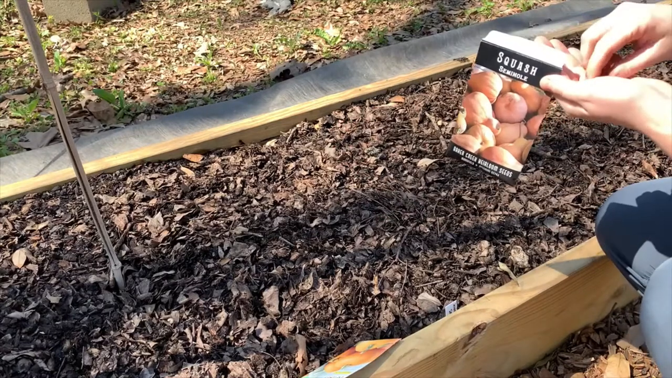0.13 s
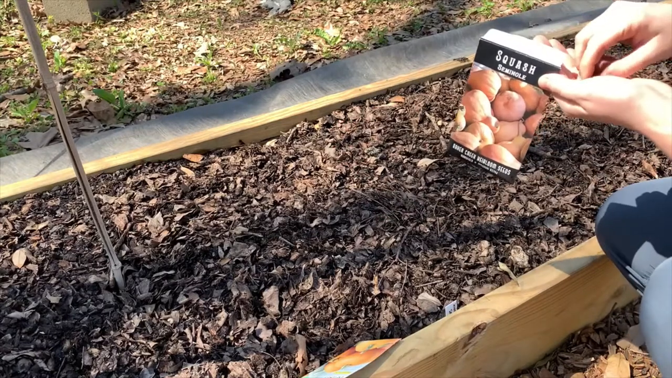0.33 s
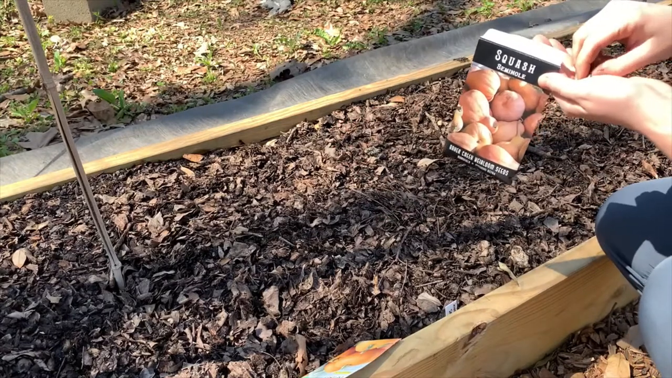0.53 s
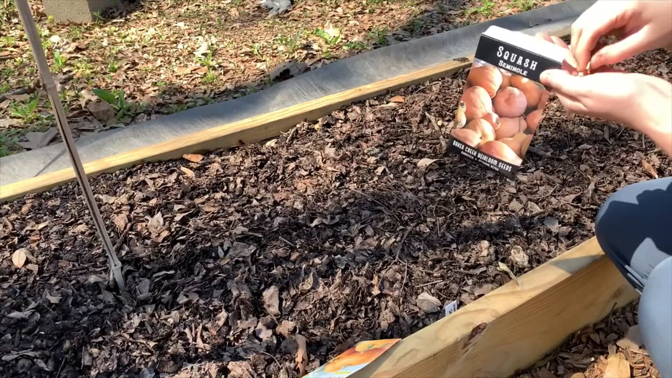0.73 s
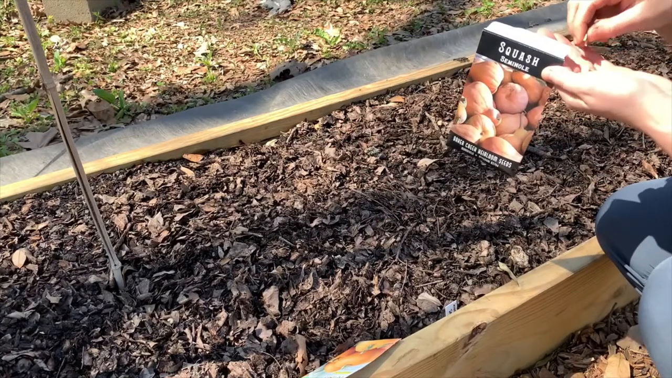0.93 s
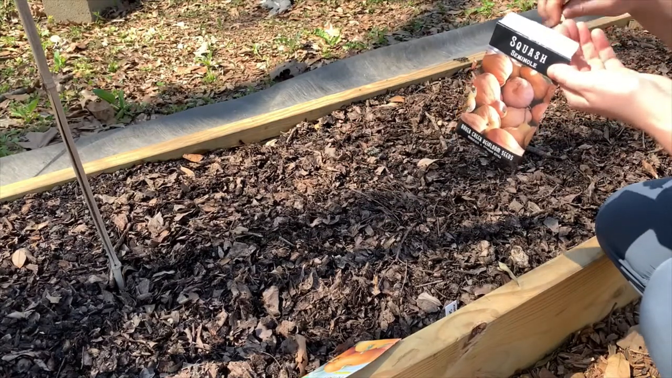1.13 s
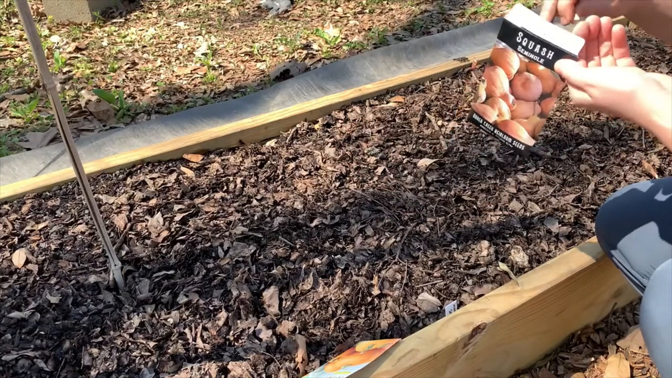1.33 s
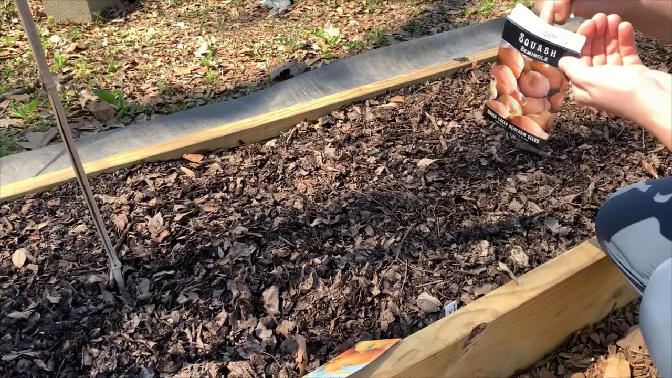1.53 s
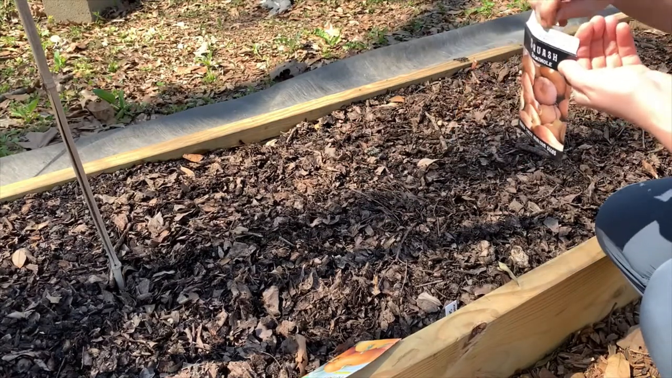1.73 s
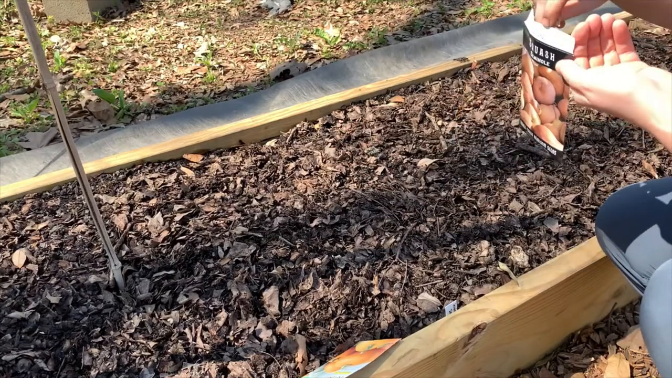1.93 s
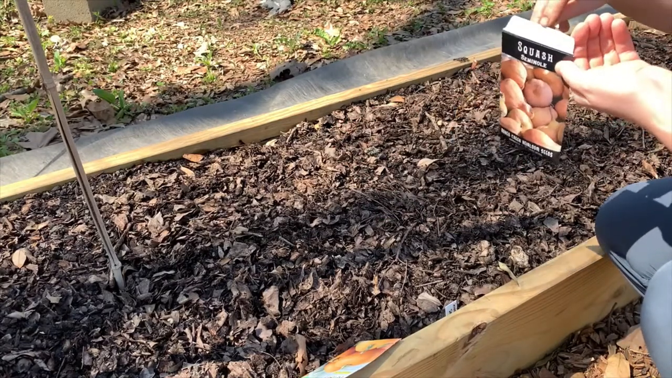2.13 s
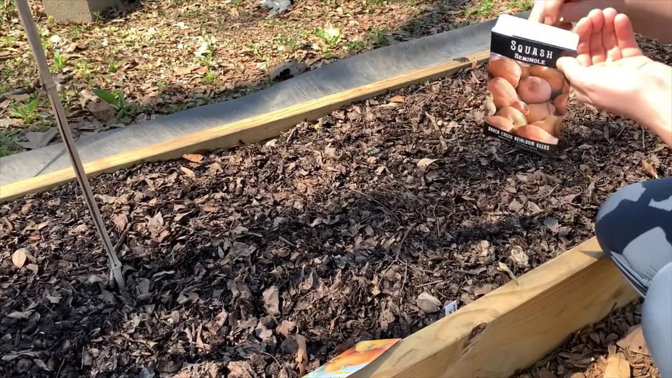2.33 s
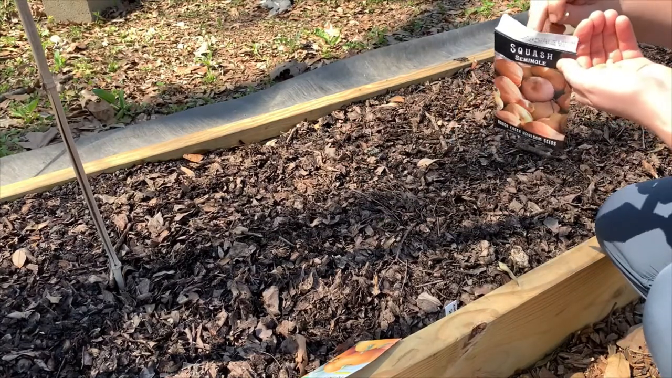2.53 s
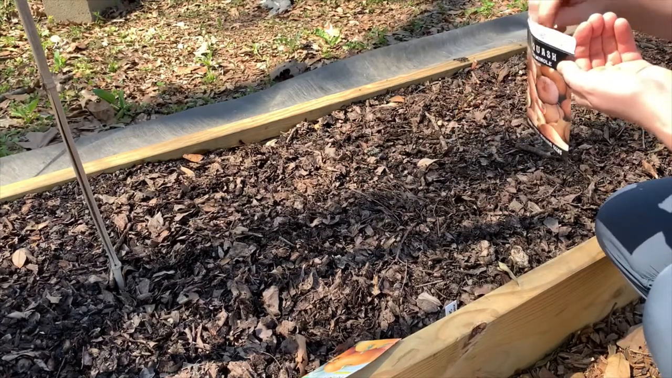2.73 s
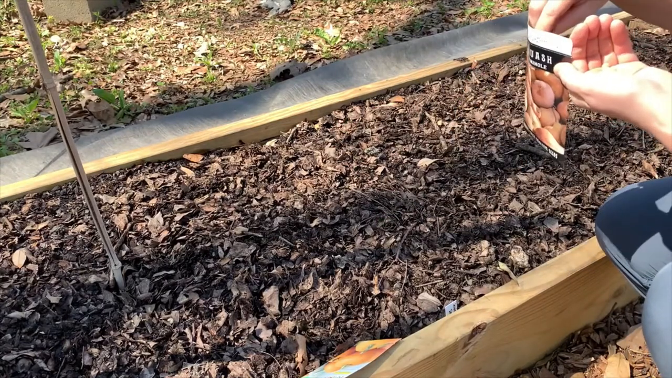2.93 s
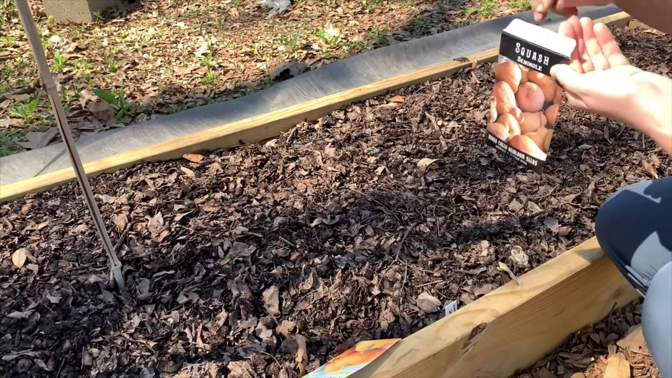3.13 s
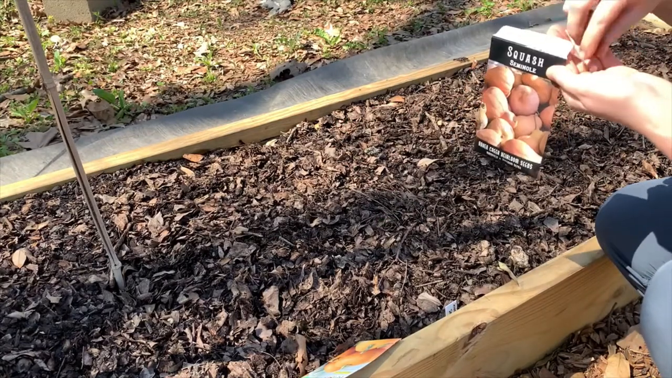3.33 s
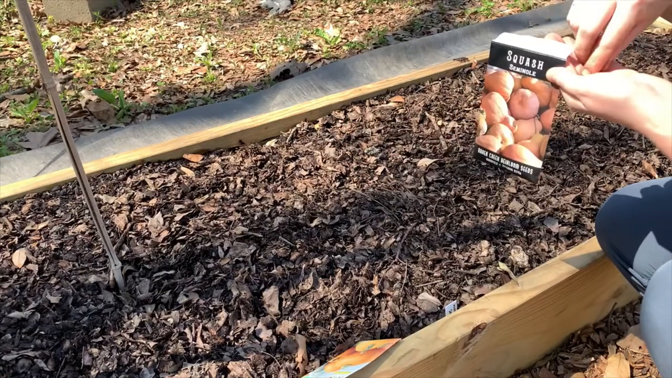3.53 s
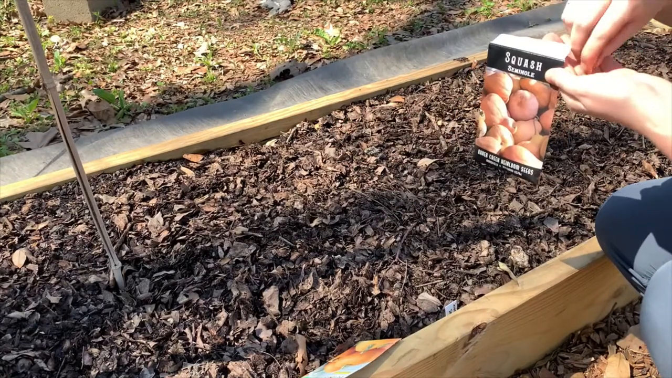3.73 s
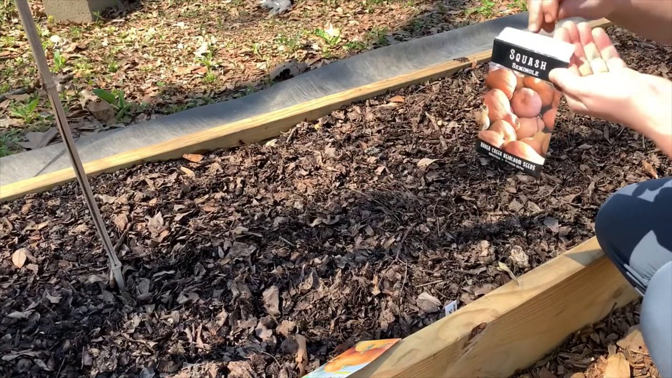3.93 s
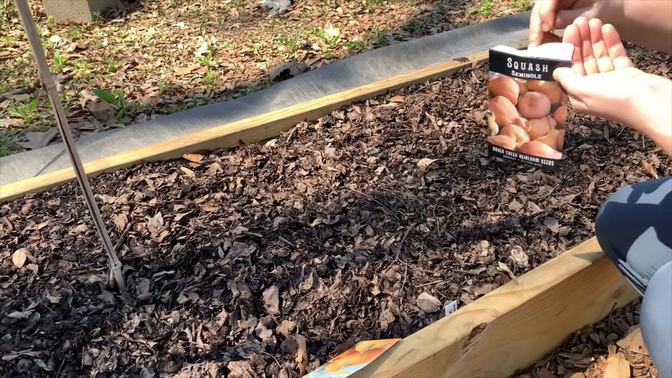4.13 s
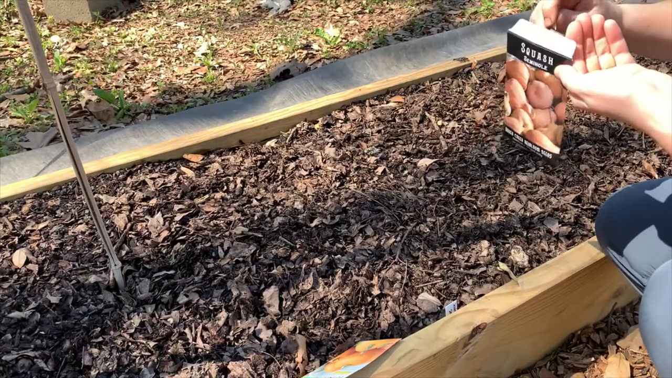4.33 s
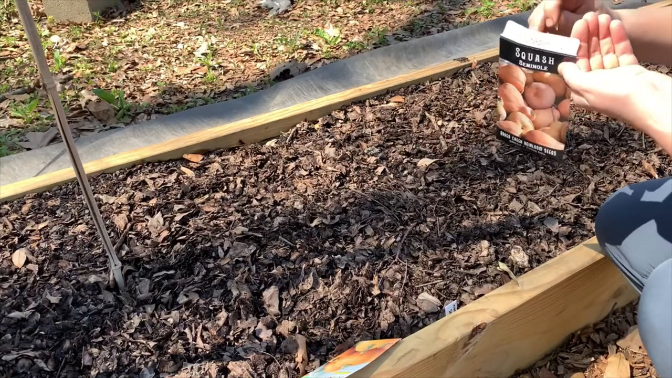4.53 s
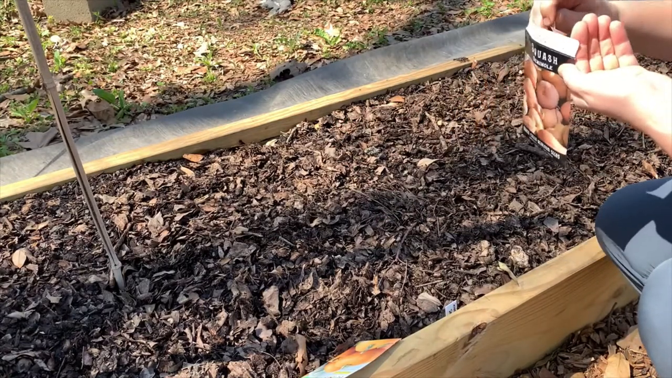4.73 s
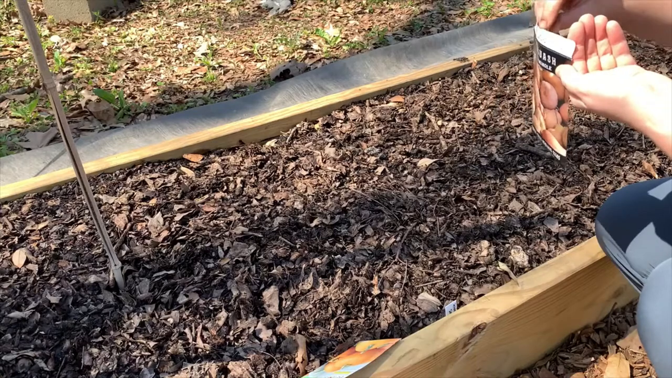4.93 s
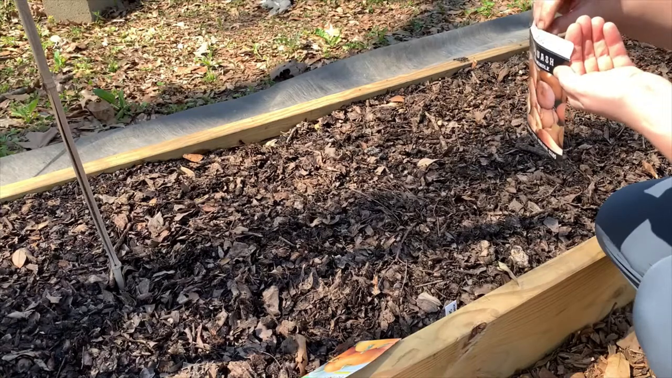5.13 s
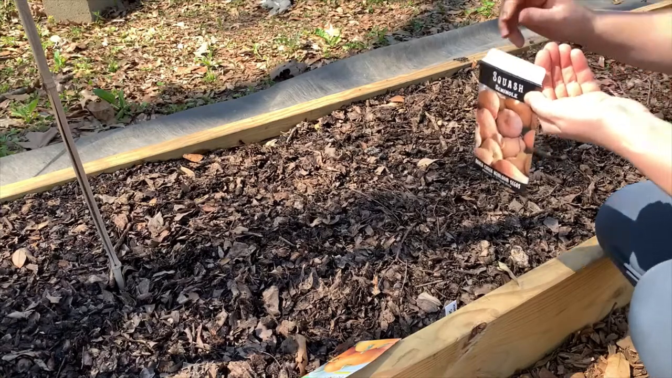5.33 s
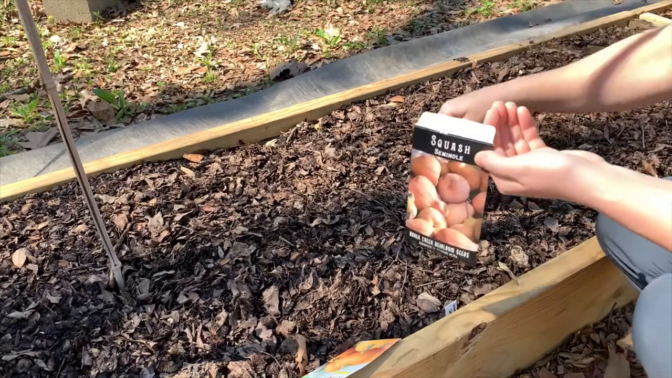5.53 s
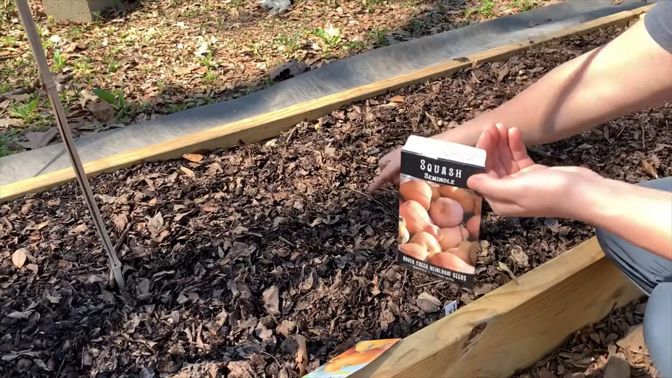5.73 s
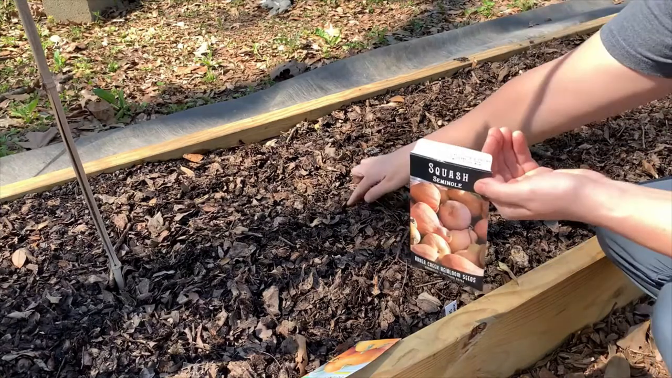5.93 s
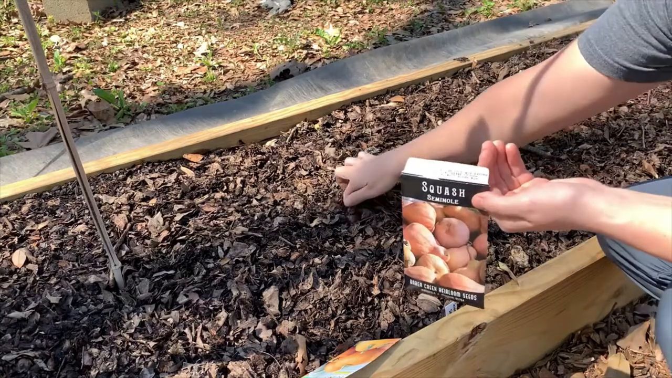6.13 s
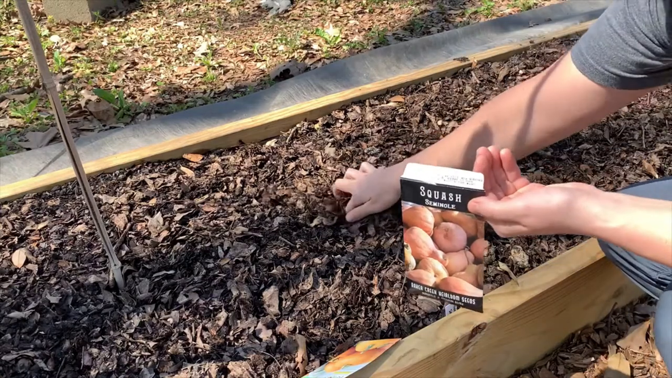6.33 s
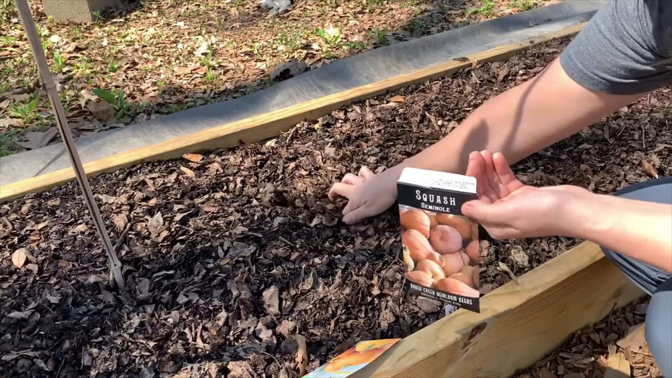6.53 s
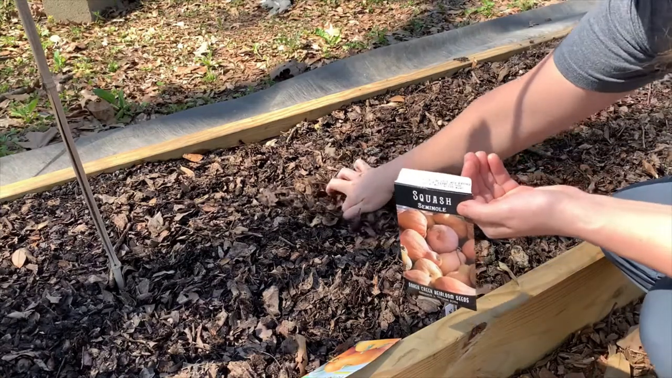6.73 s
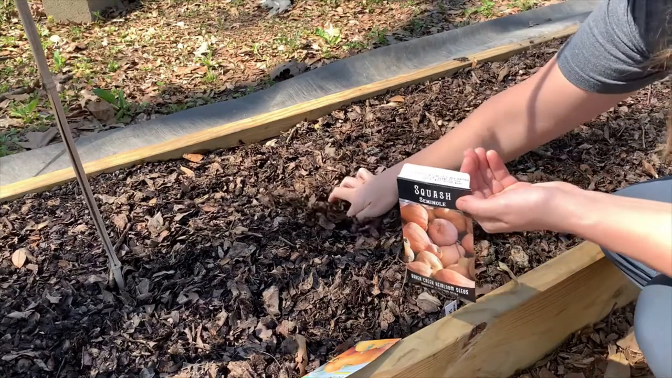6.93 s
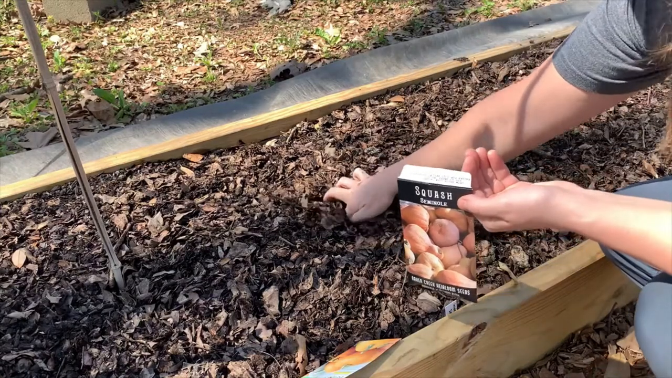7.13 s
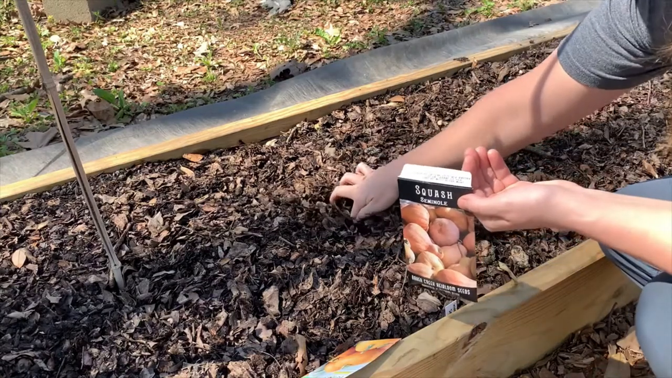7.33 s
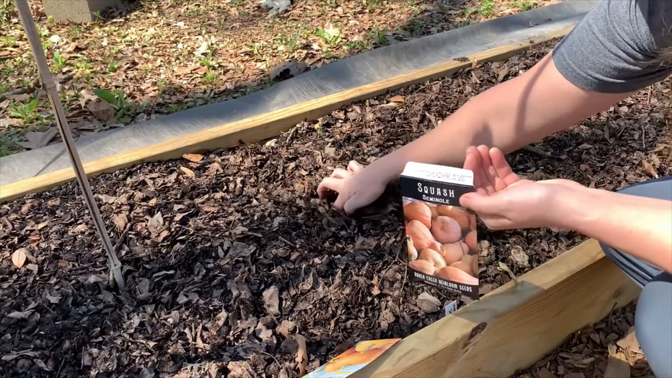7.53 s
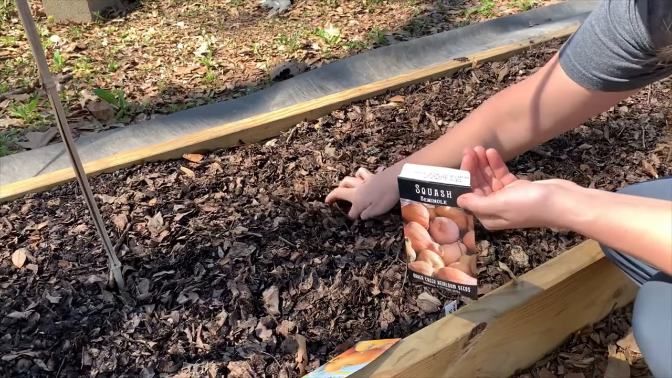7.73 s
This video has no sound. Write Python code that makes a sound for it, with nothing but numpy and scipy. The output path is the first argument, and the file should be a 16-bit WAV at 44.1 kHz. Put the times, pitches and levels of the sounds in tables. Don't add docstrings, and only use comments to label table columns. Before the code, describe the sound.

Outdoors, a brief falling bird whistle, then close dry paper rustling with seed taps, ending in faint bark-chip scratching above low wind and distant engines.

```python
import sys
import numpy as np
from scipy import signal
from scipy.fft import rfft, irfft, next_fast_len
from scipy.io import wavfile
from scipy.ndimage import uniform_filter1d, minimum_filter1d

SR = 44100
rng = np.random.default_rng(int(sys.argv[2]) if len(sys.argv) > 2 else 0)


def volts_from_db(level):
    exponent = np.asarray(level, float) / 20
    return 10 ** exponent


def to_wav(s):
    ch = np.atleast_2d(s).T
    pcm = np.round(np.clip(ch, -1, 1) * 32767)
    wavfile.write(sys.argv[1], SR, pcm.astype(np.int16))


N = 343695


def evened(x):
    return x / np.sqrt(np.mean(x ** 2) + 1e-20)


def read(points, hz, outside=None):
    f, value = np.transpose(points)
    return np.interp(np.log(hz + 1), np.log(f + 1), value, outside, outside)


def follow(rows):
    s, *columns = np.transpose(rows)
    return [np.interp(np.arange(N) / SR, s, c) for c in columns]


def coloured(x, points):
    size = next_fast_len(N)
    gain = volts_from_db(read(points, np.fft.rfftfreq(size, 1 / SR), -86.0))
    return evened(irfft(rfft(x, size) * gain, size)[..., :N])


def resonate(x, hz, width_hz):
    turn = np.exp(2j * np.pi * hz * np.arange(1, x.shape[-1] + 1) / SR)
    r = np.exp(-np.pi * width_hz / SR)
    return 2 * (turn * signal.lfilter([1 - r], [1, -r], x / turn)).real


def slow(per_s):
    drift = signal.lfilter(*signal.butter(2, per_s, fs=SR), rng.standard_normal(N + SR))
    return evened(drift[SR:])


def add(mix, s, sound):
    part = mix[..., round(s * SR):][..., :sound.shape[-1]]
    part += sound[..., :part.shape[-1]]


def patchy(x, depth_db, size=256):
    z = signal.stft(x, nperseg=size)[2]
    patches = rng.standard_normal(z.shape[1:])
    patches = uniform_filter1d(patches, size=5, axis=0)
    patches = uniform_filter1d(patches, size=10, axis=1)
    return signal.istft(z * volts_from_db(depth_db * evened(patches)), nperseg=size)[1][:, :N]


# (pitch_hz, level_db per Hz)
TRAFFIC_MID = [(94, -1.5), (160, -5), (186, -3), (213, -7), (330, -10.5), (495, -13.5), (835, -11.5),
               (988, -12), (1580, -18.5), (3060, -32.5), (4580, -57), (6320, -59), (9000, -74),
               (11700, -92.5), (19800, -120)]
# (pitch_hz, level_db per Hz)
TRAFFIC_SIDE = [(94, -43), (160, 5.5), (189, -5.5), (210, -11), (342, -13.5), (471, -12), (755, -5.5),
                (1130, -8), (1780, -17), (4580, -47), (9000, -61), (11700, -78.5), (19800, -120)]
TRAFFIC_DB, TRAFFIC_SIDE_DB, TRAFFIC_SWELL_DB = -49.5, 2, .6


def traffic():
    mid = coloured(rng.standard_normal(N), TRAFFIC_MID)
    side = volts_from_db(TRAFFIC_SIDE_DB) * coloured(rng.standard_normal(N), TRAFFIC_SIDE)
    level = volts_from_db(TRAFFIC_DB + TRAFFIC_SWELL_DB * slow(12.0))
    return level * np.array([mid + side, mid - side])


# (start pitch_hz, end pitch_hz, start level_db, end level_db)
MOTOR_HUMS = [(85, 80.5, -40, -48), (93, 92.6, -39, -45), (152.5, 152.3, -55, -53),
              (183.1, 182.8, -56, -58), (279, 278.8, -67, -66), (372, 372, -68, -72)]
HUM_DB, HUM_WAVER_DB = -1, 2
# (time_s, pitch_hz, level_db)
RECEDING_ENGINE = [(0, 135, -43.5), (.8, 135, -40), (1.1, 135, -51), (1.5, 134.8, -38), (2.1, 133.6, -45.5),
                   (2.6, 132.8, -48), (3.3, 132.2, -38), (3.7, 130, -61), (4.1, 128.3, -49.5),
                   (4.7, 127.5, -36), (5.1, 126.3, -44.5), (5.5, 125.3, -39.5), (6, 123, -45.5),
                   (6.6, 122.4, -40.5), (7.3, 122, -40), (7.79, 122.5, -56)]


def motors():
    tones = [follow(RECEDING_ENGINE)]
    for hz0, hz1, db0, db1 in MOTOR_HUMS:
        db = np.linspace(db0, db1, N) + HUM_DB + HUM_WAVER_DB * slow(3.3)
        tones.append((np.linspace(hz0, hz1, N), db))
    out = np.zeros(N)
    for hz, db in tones:
        turns = np.cumsum(hz + 0.36 * slow(3.22)) / SR + rng.random()
        out += volts_from_db(db) * np.sqrt(2) * np.sin(2 * np.pi * turns)
    return out


# (pitch_hz, level_db per Hz)
WIND_COLOUR = [(12, -41.5), (20, -18.5), (63, 6), (96, 6), (144, -4), (230, -26.5), (300, -30), (510, -120)]
# (time_s, level_db)
WIND_GUSTS = [(0.0, -36), (0.38, -36.5), (0.45, -40), (0.5, -35.5), (0.89, -33.5), (1.11, -29.5),
              (1.3, -30.5), (1.9, -30), (2.3, -34), (3.3, -37), (3.65, -37.5), (4.15, -32), (4.25, -34.5),
              (4.55, -31), (5.2, -36), (6.8, -37.5), (7.7, -37), (7.79, -41)]


def wind_rumble():
    middle, wide = coloured(rng.standard_normal((2, N)), WIND_COLOUR) * volts_from_db(follow(WIND_GUSTS)[0] - 3.0)
    return np.array([middle + 0.27 * wide, middle - 0.36 * wide])


# (start_s, peak level_db, pitch_hz,
# length in cycles)
LOW_BUMPS = [(0.788, -35.5, 120, 2.9), (1.004, -42.5, 165, 1.8), (1.113, -33, 95.5, 2),
             (1.18, -27, 178, 1.8), (1.457, -38, 127, 2.8), (2.682, -36.5, 98, 0.93),
             (4.461, -42.5, 119, 6.4), (4.509, -35.5, 81, 2.3), (4.629, -38, 75.4, 2.1),
             (4.291, -47, 332, 2.8), (2.289, -49, 350, 4.2), (4.177, -43.5, 506, 4.2)]


def low_bumps():
    out, t = np.zeros(N), np.arange(3500) / SR
    for s, db, hz, cycles in LOW_BUMPS:
        turns = hz * 0.0161 * np.log(1 + 1.92 * t / 0.0184)
        shape = np.exp(-t * hz / cycles) * np.minimum(t / 0.0016, 1)
        add(out, s, volts_from_db(db + 9.5) * np.sin(2 * np.pi * turns) * shape)
    return out


# (time_s, pitch_hz, level_db)
BIRD_NOTES = [
    [(.012, 7000, -71), (.04, 6520, -69), (.058, 5920, -68), (.098, 5520, -66), (.125, 5220, -68),
     (.195, 4860, -64), (.235, 4520, -67), (.272, 4290, -66), (.288, 3740, -66)],
    [(.284, 3720, -61), (.33, 3600, -56), (.38, 3320, -55), (.43, 3050, -58), (.47, 2870, -62),
     (.49, 2860, -66), (.515, 2910, -66), (.55, 2910, -70), (.58, 2900, -88)],
]
FLUTTER_DB = 1.5


def bird():
    t, out = np.arange(N) / SR, np.zeros((2, N))
    for rows in BIRD_NOTES:
        hz, db = follow(rows)
        on = np.clip(np.minimum(t - rows[0][0], rows[-1][0] - t) / .006, 0, 1)
        whistle = np.sqrt(2) * np.sin(2 * np.pi * np.cumsum(hz + 18 * slow(150)) / SR)
        note = on * volts_from_db(db + FLUTTER_DB * slow(70)) * whistle
        note = note + .3 * np.roll(note, 300) + .2 * np.roll(note, 950) + .1 * np.roll(note, 1900)
        out += np.array([np.roll(note, 3), np.clip(2700 / hz, 0, 1) * note])
    return out


# (pitch_hz, level_db per Hz)
HISS_COLOUR = [(4500, -19), (6500, -9), (8700, -4), (10500, -4), (13000, -1.5), (15000, -3), (16000, -5.5),
               (16200, -53.5)]


def leaves():
    return volts_from_db(-84) * coloured(rng.standard_normal((3, N)), HISS_COLOUR)


# (start_s, peak level_db, pitch_hz)
DRY_CREASES = [(1.5445, -48, 3600), (1.559, -52, 4800), (1.5885, -38.5, 3100), (1.593, -42, 3600),
               (1.599, -46, 2400), (1.66, -43, 2800), (1.7295, -48, 6500), (2.0025, -49, 3000),
               (2.009, -49, 4000), (2.016, -46, 5000), (2.047, -50, 3500), (2.2872, -26, 8000),
               (2.597, -47, 3500), (2.616, -44, 3400), (2.629, -41, 3000), (2.635, -43, 4500),
               (2.641, -45, 3500), (2.684, -45, 4500), (3.012, -53, 6900), (3.103, -39, 2800),
               (3.129, -43, 3000), (3.135, -42, 2500), (3.149, -45, 5000), (3.179, -45, 3500),
               (3.9645, -44, 2700), (4.355, -46, 3200), (4.363, -49, 5000), (4.538, -45, 3500),
               (4.566, -47, 3300), (4.571, -48, 4000), (4.594, -46, 3500), (4.627, -49, 3900),
               (4.655, -45, 3500), (4.724, -48, 4200), (4.896, -39, 2600), (4.922, -47, 4500),
               (5.141, -49, 6000), (5.287, -55, 7000), (6.0785, -48, 5500), (6.134, -44, 6500),
               (6.239, -40, 6800), (6.4485, -43, 7000), (6.457, -54, 5500), (6.594, -60, 14400),
               (6.7565, -48, 14500), (6.836, -47, 10900), (6.8785, -54, 9000), (6.8945, -48, 8000),
               (6.9195, -41.5, 10300), (7.048, -57, 11800), (1.928, -47, 7200), (1.9945, -50, 9500),
               (2.0267, -30, 7000), (3.786, -48, 14500), (3.794, -43, 8000), (3.794, -43, 14500),
               (1.407, -44, 4700), (5.1093, -36, 6540), (5.034, -51, 5000), (4.177, -41, 1150)]
CREASE_S, CREASE_WIDTH = .0005, .5


def creases():
    out, t = np.zeros((3, N)), np.arange(200) / SR - .001
    for s, db, hz in DRY_CREASES:
        click = rng.standard_normal((3, len(t))) * np.exp(-abs(t) / CREASE_S)
        for _ in range(2):
            click = resonate(click, hz, CREASE_WIDTH * hz)
        add(out, s - .001, volts_from_db(db) * click / abs(click[0]).max())
    return out


# (start_s, peak level_db, ring pitch_hz, fizz level_db, low knock level_db)
PAPER_SNAPS = [(1.405, -39.5, 2930, -53, 2), (1.598, -49, 2300, -40, -20), (1.6594, -41.5, 2880, -47, -1),
               (2.026, -35, 3070, 0, -15), (2.2531, -37, 4730, -10, 0.5), (2.2871, -27.5, 2180, 0, -11.5),
               (2.2883, -32, 5200, -22, -17), (2.3392, -45.5, 2700, -34, -29), (2.498, -48, 3270, -22, -21),
               (2.6724, -39.5, 2980, -14, -22), (3.0308, -54, 5650, -15, 7.5),
               (3.1016, -45.5, 2470, -13.5, 1), (3.1796, -45, 2730, -30, -9),
               (3.792, -46.5, 2520, -4, -1.5), (3.9638, -43.5, 2400, -22, 2), (3.985, -40.5, 3180, -26, -3),
               (4.1757, -25.5, 3100, -29, -9.5), (4.178, -23.5, 4400, -27, -12),
               (4.1893, -42, 3000, -27, -4), (4.2911, -35.5, 2070, -13, -5), (4.294, -39, 4600, -5, -15),
               (4.352, -47, 3070, -47, -8), (4.362, -48.5, 4970, -41, -16), (4.566, -45, 3440, -32, -4),
               (4.6535, -54, 3800, -35, 4), (4.895, -40.5, 2830, -36, -4.5), (4.919, -48, 4770, -23, -7),
               (5.108, -38.5, 2460, -17, -15), (3.134, -43, 2300, -30, -9), (2.698, -51, 2300, -35, -1),
               (1.558, -50, 4700, -9, -15), (2.629, -48, 3000, -35, -17)]
# (start_s, peak level_db, fizz level_db)
SEED_TICKS = [(.7302, -62, -17), (1.7302, -53, -10), (1.9273, -53, -13), (1.953, -51, -11),
              (1.9944, -60, -1), (2.0092, -54, -10), (2.017, -49, -10), (2.047, -54, -7), (2.059, -58, -8),
              (2.1594, -52, -27), (2.2, -56, -28), (2.26, -54, -5), (2.4547, -66, -3), (2.584, -58, 0),
              (2.598, -58, -2), (2.64, -51, -35), (2.686, -52, -30), (2.9986, -67, -9), (3.0404, -61, 0),
              (3.059, -63, 1), (3.122, -51, -25), (3.15, -53, -30), (3.187, -56, -14), (3.4, -68, -6),
              (3.7855, -54, -7), (3.975, -59, -7), (4.067, -62, -20), (4.085, -58, -28), (4.2135, -64, -1),
              (4.2255, -70, 0), (4.286, -52, -7), (4.526, -56, -12), (4.537, -53, -30), (4.594, -54, -35),
              (4.6264, -56, -35), (4.7234, -57, -30), (5.024, -51, -19), (5.033, -49, -15),
              (5.045, -64, -4), (5.0757, -64, 1), (5.102, -58, 0), (5.1404, -55, -9), (5.2131, -68, -19),
              (5.23, -62, -11), (5.286, -61, -10), (5.3056, -54, -18)]
# (start_s, peak level_db, ring pitch_hz, fizz level_db)
BARK_CHIPS = [(5.8841, -66, 5000, -9), (5.8936, -62, 5000, -9), (6.078, -52, 4500, -12),
              (6.134, -50, 6300, -11), (6.2172, -60, 6500, -8), (6.2385, -51, 6550, -5),
              (6.4482, -46, 6500, 1), (6.457, -57, 6000, -15), (6.594, -66, 6500, 0),
              (6.7562, -60, 6500, 0), (6.8344, -62, 6400, 0), (6.92, -62, 6410, -2), (7.0475, -66, 6500, 0),
              (7.278, -69, 6500, -2), (7.288, -70, 6500, -2), (7.4812, -57, 5030, 5),
              (7.4875, -65, 5000, -3), (7.5045, -53, 3100, -10), (7.5864, -57, 4000, -8),
              (7.7255, -66, 6500, -2)]
SNAP_T60_S, TICK_T60_S, CHIP_T60_S = 0.037, 0.018, 0.0062
TICK_HZ, TICK_KNOCK_DB, CHIP_KNOCK_DB = 2700, -12, -3


def cracks():
    paper = [(s, db, hz, fizz, SNAP_T60_S, knock) for s, db, hz, fizz, knock in PAPER_SNAPS]
    seeds = [(s, db, TICK_HZ, fizz, TICK_T60_S, TICK_KNOCK_DB) for s, db, fizz in SEED_TICKS]
    return paper + seeds + [(*row, CHIP_T60_S, CHIP_KNOCK_DB) for row in BARK_CHIPS]


# (pitch_hz, level_db)
SHEET_MODES = [(2150, 6), (2990, 2), (3470, -3), (4410, -6.5), (5320, -4), (6400, -9)]
SHEET_DB, SHEET_WIDTH_HZ = -9, 59
TICK_S, TICK_SHARPENS = .0011, .5
DULL_OVER_DB = -2.5


def snaps():
    out, t = np.zeros((3, N)), np.arange(3000) / SR - .004
    edges_hz = [1400, 7500], [6000, 15900], [300, 2600]
    body, fizz, low = (signal.butter(3, edges, "band", fs=SR, output="sos") for edges in edges_hz)
    dull = signal.butter(8, 12000, fs=SR, output="sos")
    for s, db, hz, fizz_db, t60, knock_db in cracks():
        spray = rng.standard_normal((3, len(t)))
        bend = 1 + .02 * spray[0, 0]
        fall = np.where(t < 0, .3 * np.exp(t / .0011), volts_from_db(-60 * t / np.clip(t60, .004, .1)))
        dying = spray * fall
        modes = np.zeros((3, len(t)))
        for mode_hz, mode_db in SHEET_MODES:
            modes[:, :1500] += volts_from_db(mode_db) * resonate(dying[:, :1500], mode_hz * bend, SHEET_WIDTH_HZ)
        ring = resonate(dying, hz, 500)
        sheet = signal.sosfilt(body, dying) + 4.0 * ring + 2 * volts_from_db(SHEET_DB) * modes
        tick_s = TICK_S * volts_from_db(-TICK_SHARPENS * (db + 50))
        tick = spray * (.16 * fall ** 1.8 + np.exp(-abs(t - .0007) / tick_s))
        hiss = signal.sosfilt(fizz, tick)
        if db - fizz_db > DULL_OVER_DB:
            hiss = signal.sosfilt(dull, hiss)
        knock = signal.sosfilt(low, (np.gradient(spray, axis=1) + 1.3 * spray) * fall)
        for layer, layer_db in (sheet, 0), (hiss, 0.59 * fizz_db + 10.0), (knock, knock_db - 0.5):
            add(out, s - .004, volts_from_db(db + 3 + layer_db) * layer / abs(layer[0]).max())
    return out


# (start_s, hold_s, level_db, fizz above the
# body in db)
PACKET_STROKES = [
    (0.1, 0.086, -87, 14),
    (0.54, 0.034, -81.5, 8),
    (0.73, 0.041, -75, -17),
    (1.145, 0.02, -77, 7),
    (1.214, 0.15, -79.5, -2.5),
    (1.406, 0.098, -81, -19),
    (3.444, .03, -85, -9),
    (3.491, 0.04, -74.5, 3.5),
    (3.779, 0.0094, -69.5, 1),
    (5.353, 0.29, -89, 8),
                  (1.542, .035, -65, 6), (1.577, 0.019, -52.5, -7), (1.63, 0.03, -66, -6),
                 (1.7, 0.064, -72, -10), (2.01, 0.021, -61.5, 13), (2.06, 0.038, -63.5, 3),
                 (2.24, 0.1, -66, -5.5), (2.442, 0.069, -64, 0.5), (2.578, 0.025, -60, 12.5),
                 (2.615, 0.018, -51, -9), (2.67, 0.14, -65, 3), (2.8, 0.11, -71, -16),
                 (3.0, 0.0094, -62.5, 5), (3.032, 0.041, -70.5, 20), (3.103, 0.033, -53, 2),
                 (3.177, 0.0058, -56.5, -9), (3.21, 0.098, -79, -25), (3.963, 0.035, -64, -6),
                 (4.02, 0.06, -68, -24), (4.167, 0.18, -65, -20), (4.281, 0.085, -65.5, -6),
                 (4.408, 0.088, -64, -8.5), (4.552, 0.03, -57, -5), (4.6, .03, -73, -15),
                 (4.649, 0.035, -60.5, -5), (4.71, 0.215, -68, -9), (5.02, 0.0074, -90.5, -14),
                 (5.099, 0.038, -65.5, -8), (5.221, 0.046, -64.5, 6.5), (5.3, 0.025, -75, -14)]
# (start_s, hold_s, level_db, fizz above the body in db)
MULCH_SCRAPES = [(5.917, 0.17, -88, 30), (6.126, 0.051, -71.5, 11), (6.216, 0.025, -69.5, 24),
                 (6.26, 0.25, -75.5, 20), (6.584, 0.1, -83, 20), (6.696, 0.096, -75.5, 14),
                 (6.805, 0.13, -76.5, 25.5), (6.953, 0.075, -79.5, 20), (7.066, 0.16, -84.5, 15),
                 (7.2, 0.12, -80.5, 1), (7.33, 0.07, -91, 10.5), (7.468, 0.12, -86.5, 24),
                 (7.689, 0.074, -78, 19)]
RISE_DB_PER_S = 1100


def strokes(shift, fall_db_per_s):
    t = np.arange(0, N, 32) / SR
    power = np.zeros(len(t))
    for s, hold, db, fizz_db in PACKET_STROKES + MULCH_SCRAPES:
        fade_db = RISE_DB_PER_S * np.maximum(s - t, 0) + fall_db_per_s * np.maximum(t - s - hold, 0)
        power += volts_from_db(db + shift * fizz_db - fade_db) ** 2
    return np.interp(np.arange(N) / SR, t, np.sqrt(power))


# (pitch_hz, level_db per Hz)
PAPER_COLOUR = [(900, -28.5), (1600, -4.5), (2300, 2.5), (3200, 0.5), (4500, -1.5), (6000, -6), (8000, -11),
                (11000, -14.5)]
GRAINS_PER_S, GRAIN_SPREAD_DB = 5000, 1
PATCHY_DB, FIZZ_PATCHY_DB, STREAK_DB = 4, 2, 1.2
BODY_FALL_DB_PER_S, FIZZ_FALL_DB_PER_S, REST_DB = 299.5, 497, -86
CRACKLES_PER_S, CRACKLE_DB = 400, -5
GRIT_FROM_S, GRIT_DB = 5.6, -10


def rubbing():
    body = strokes(0, BODY_FALL_DB_PER_S) + volts_from_db(REST_DB)
    fizz = strokes(0.64, FIZZ_FALL_DB_PER_S)
    slips = (rng.random((3, N)) < GRAINS_PER_S / SR) * rng.standard_normal((3, N))
    slips = slips * volts_from_db(GRAIN_SPREAD_DB * np.minimum(rng.exponential(1, N), 4) + 0.53 * slow(30))
    slips = patchy(slips, STREAK_DB, size=1024)
    hiss = patchy(slips, FIZZ_PATCHY_DB)
    slips = patchy(slips, PATCHY_DB)
    sizes = (rng.random(N) < CRACKLES_PER_S / SR) * np.minimum(rng.exponential(1, N), 2)
    crackle = patchy(sizes * rng.standard_normal((3, N)), PATCHY_DB)
    digging = np.arange(N) > GRIT_FROM_S * SR
    grit = digging * volts_from_db(GRIT_DB) * coloured(crackle, HISS_COLOUR)
    paper = coloured(slips, PAPER_COLOUR) + ~digging * volts_from_db(CRACKLE_DB) * coloured(crackle, PAPER_COLOUR)
    return body * paper, fizz * (coloured(hiss, HISS_COLOUR) + grit)


# (pitch_hz, left minus right level_db)
LEFT_OVER_RIGHT = [(2000, 0), (3000, -3), (4200, -5), (5200, -8), (6200, -3), (7200, 0), (11000, 1),
                   (16000, 1)]
# (pitch_hz, level_db relative to the direct sound)
PORT_SCATTER = [(1500, 7.5), (3000, -7.5), (6000, -2.5), (9000, -5), (16000, -12)]


def ports(rows, phase):
    hz = np.fft.rfftfreq(512, 1 / SR)
    half = volts_from_db(read(LEFT_OVER_RIGHT, hz) / 2) * np.exp(.5j * np.interp(hz, *np.transpose(phase)))
    pair = np.array([half, 1 / half])
    filters = irfft([pair, abs(pair) * volts_from_db(read(PORT_SCATTER, hz))])
    direct, scatter = np.roll(filters, 256, axis=2) * np.hanning(512)
    heard = signal.oaconvolve(rows[:1], direct, axes=1) + signal.oaconvolve(rows[1:], scatter, axes=1)
    return heard[:, 256:N + 256]


# (pitch_hz, radians the left port leads)
BODY_PHASE = [(0, 0), (1500, -.7), (4500, -.5), (5400, -2.4), (8400, -3.14), (11000, -6.28), (13200, -9.42),
              (16000, -12.57), (21000, -18.8)]
# (pitch_hz, radians the left port leads)
HISS_PHASE = [(0, 0), (4500, 2.2), (6600, 0), (8400, -3.14), (11000, -6.28), (13200, -9.42),
              (16000, -12.57), (21000, -18.8)]


def scene():
    background = traffic() + motors() + wind_rumble() + low_bumps() + bird()
    body, fizz = rubbing()
    packet = ports(body + snaps() + creases(), BODY_PHASE)
    return background + packet + ports(fizz + leaves(), HISS_PHASE)


def drop_near_attacks(pair):
    z = signal.stft(pair, SR, "cosine", 256, 128)[2]
    bands = 10 * np.log10((abs(z[:, :-1]) ** 2).reshape(2, 16, 8, -1).mean(2) + 1e-20)
    loudest = -minimum_filter1d(-bands.max(0), 13, axis=1)
    dropped = bands + 2 * rng.standard_normal(bands.shape) < loudest - 24
    dropped[:, :5] = False
    z[:, :-1] *= ~np.repeat(dropped, 8, axis=1)
    return signal.istft(z, SR, "cosine", 256, 128)[1][:, :N]


DROP_PAIR_DB, DROP_UP_DB, DROP_DB_PER_OCTAVE = 5.5, 18, 24
WEAK_LINE_DB, WEAK_LOW_LINE_DB = -3.5, -7


def drop_weak_treble(dry):
    hz, _, z = signal.stft([dry[0] + dry[1], dry[0] - dry[1]], SR, "cosine", 2048, 1024, boundary="even")
    line_hz = hz[:-1, None]
    power = abs(z[:, :-1]) ** 2
    lines = 10 * np.log10(power + 1e-20)
    bands = 10 * np.log10(power.reshape(2, 32, 32, -1).mean(2) + 1e-20)
    slope = DROP_DB_PER_OCTAVE * np.log2(hz[16::32])[:, None]
    from_below = np.maximum.accumulate(bands.max(0) + slope, 0) - slope - DROP_UP_DB
    need = np.maximum(bands[::-1] - DROP_PAIR_DB, from_below) + 1.5 * rng.standard_normal(bands.shape)
    band_lines = np.repeat(bands, 32, axis=1)
    dropped = np.repeat(bands < need, 32, axis=1) | (lines < band_lines + WEAK_LINE_DB)
    no_tone = lines.reshape(2, 32, 32, -1).max(2) < bands + 6.5
    dropped &= np.repeat(no_tone, 32, axis=1) | (lines < band_lines)
    treble_db = bands[:, 8:22].mean((0, 1))
    jump_db = np.diff(treble_db, prepend=0)
    sudden = jump_db > 3
    z[:, :-1] *= ~(dropped & (line_hz > 3500) & ~sudden & ~np.roll(sudden, 1))
    z[:, hz > 16600] = 0
    near = 10 * np.log10(abs(uniform_filter1d(abs(z[:, :-1]) ** 2, 9, axis=1)) + 1e-20)
    z[:, :-1] *= ~((lines < near + WEAK_LOW_LINE_DB) & (line_hz > 300) & (line_hz < 3500))
    hard = jump_db > 15
    z[:, hz > 15850] *= hard | np.roll(hard, 1)
    mid, side = drop_near_attacks(signal.istft(z, SR, "cosine", 2048, 1024)[1][:, :N])
    return np.array([mid + side, mid - side]) / 2


def low_pass(x):
    return signal.sosfilt(signal.butter(12, 16990, fs=SR, output="sos"), x)


def record(dry):
    mix = drop_weak_treble(dry * np.minimum(np.arange(N) / 300, 1))
    return low_pass(mix)


dry = scene()
out = record(dry)
to_wav(out)
```